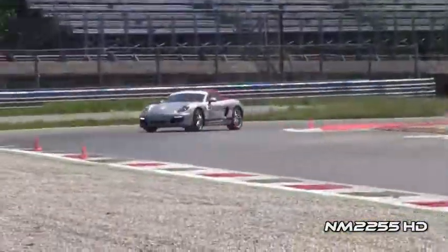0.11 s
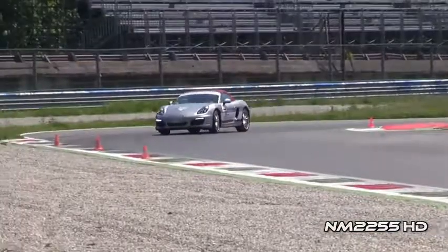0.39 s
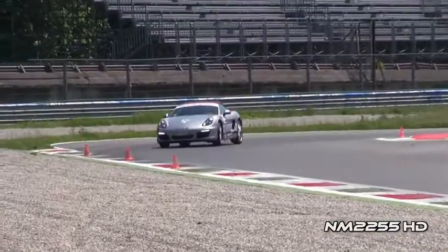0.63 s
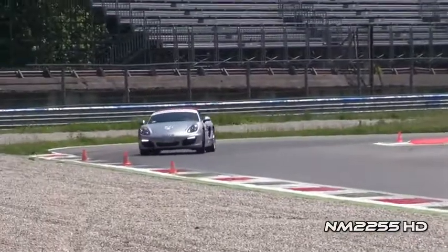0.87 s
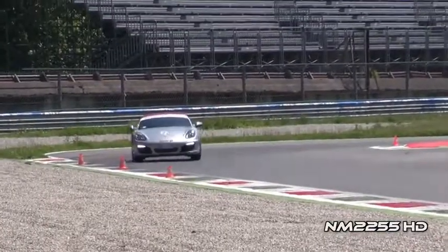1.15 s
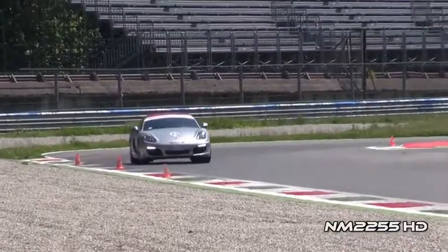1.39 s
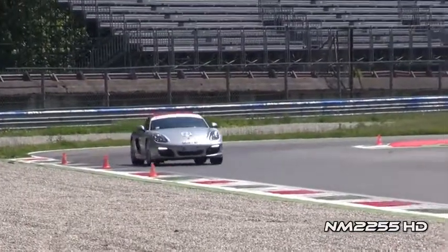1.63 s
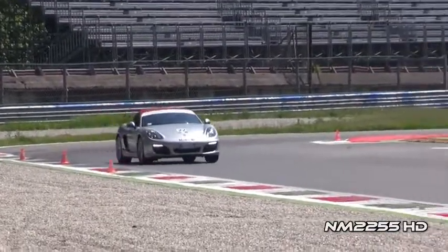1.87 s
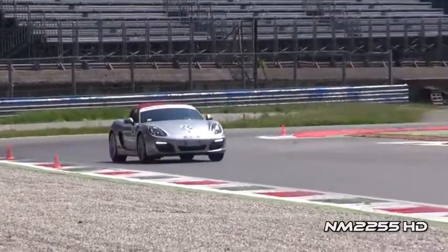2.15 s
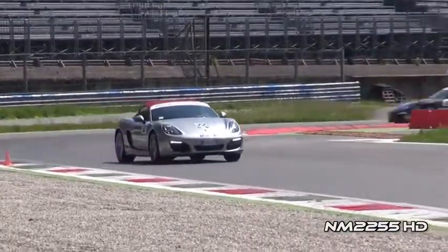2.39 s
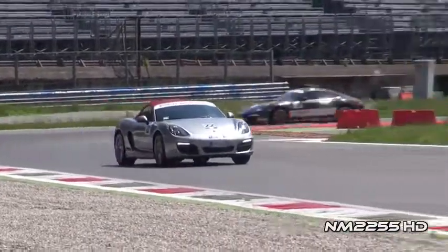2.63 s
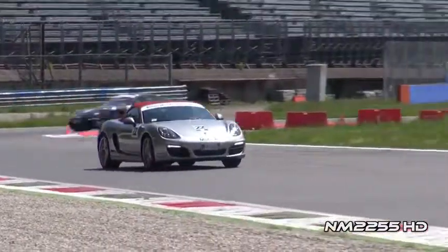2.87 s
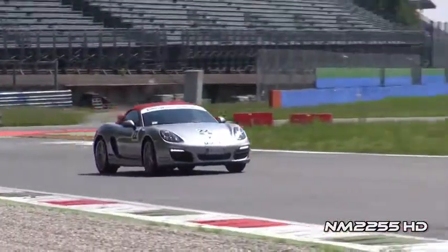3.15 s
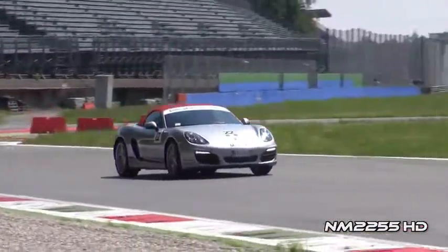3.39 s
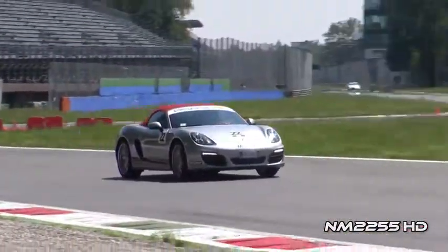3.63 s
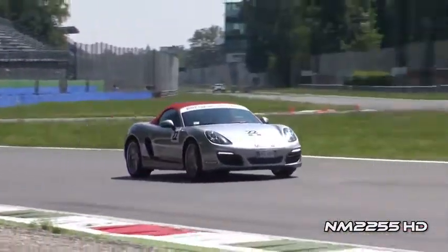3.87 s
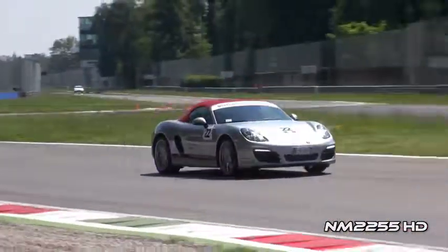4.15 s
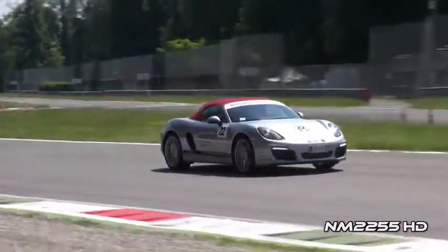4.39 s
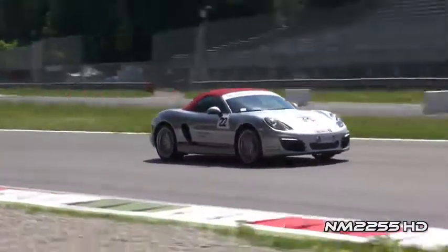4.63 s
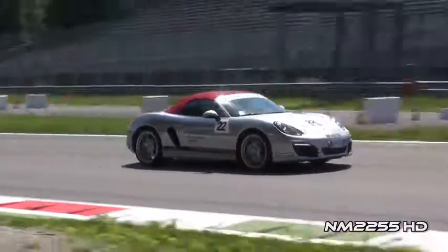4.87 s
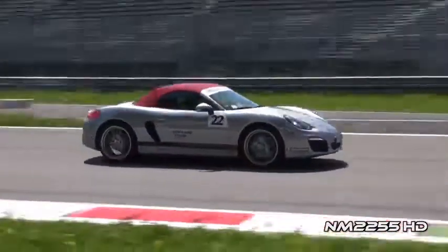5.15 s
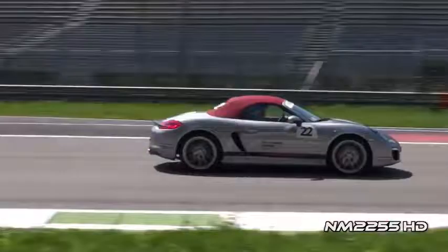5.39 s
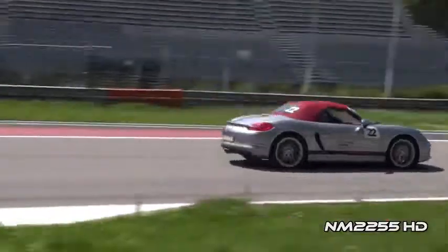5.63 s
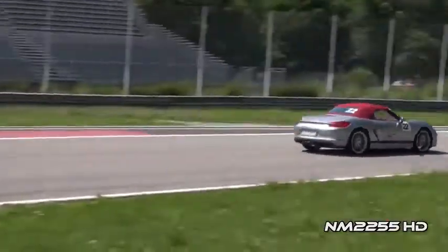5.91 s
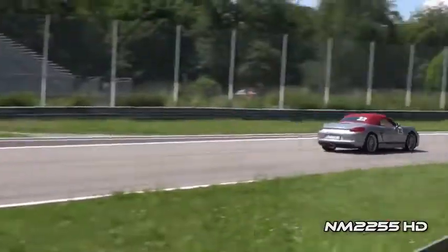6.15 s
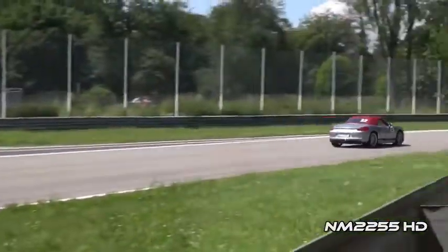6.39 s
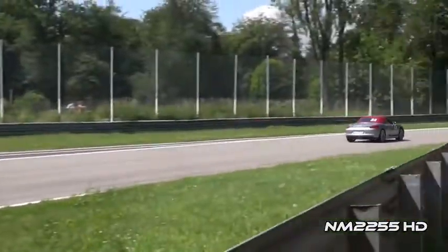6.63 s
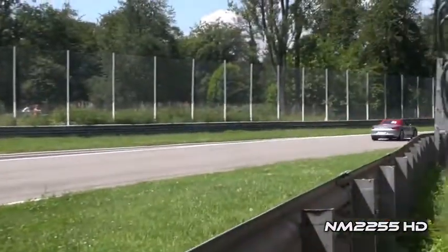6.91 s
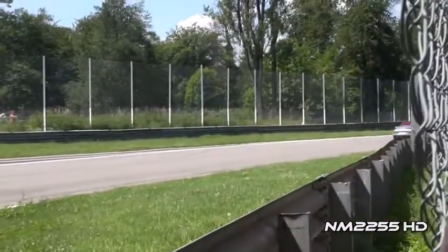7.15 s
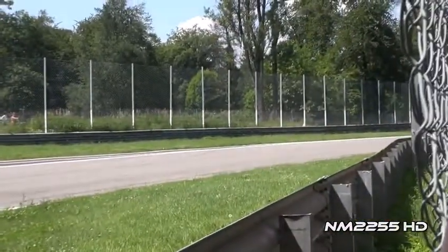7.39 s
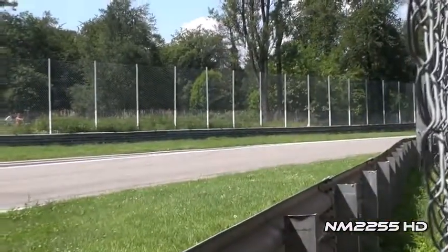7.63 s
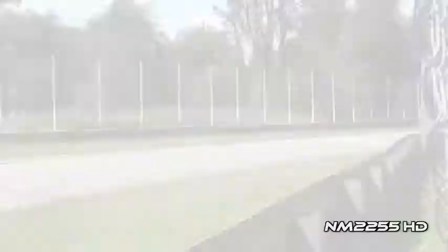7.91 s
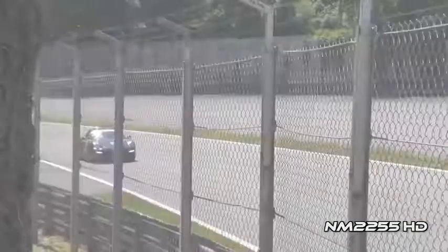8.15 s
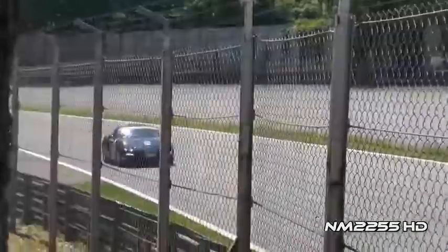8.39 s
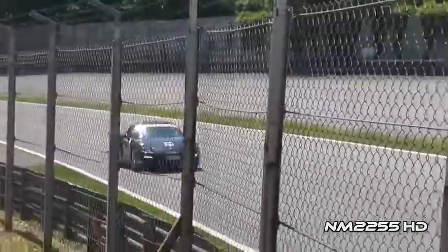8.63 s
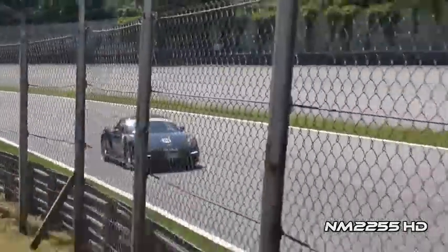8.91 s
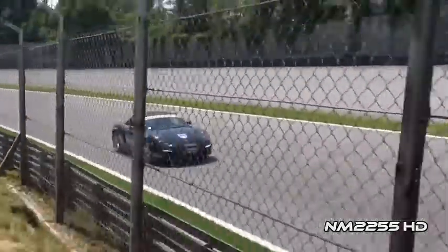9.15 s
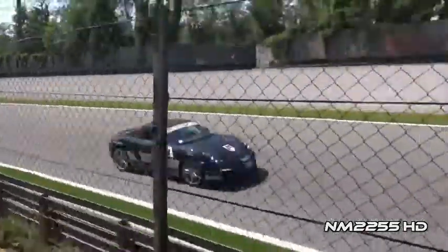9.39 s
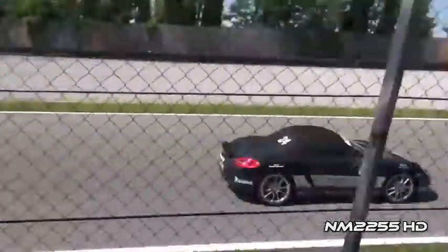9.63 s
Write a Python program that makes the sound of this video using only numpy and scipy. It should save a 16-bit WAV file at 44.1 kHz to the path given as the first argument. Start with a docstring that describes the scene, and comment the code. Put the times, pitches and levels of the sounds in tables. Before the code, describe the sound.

A sports car accelerates out of a bend, shifts up and howls past close by, then another rushes by with a louder tyre roar.

```python
"""Sports cars passing at a race circuit

A six-cylinder car speeds up, shifts up and passes close; a second follows on the left, then a third rushes by.
Engines are sums of pure tones tied to the firing rate, tyres are tones scattered by noise, and the roar is
bands of noise. A bird whistles early on over a far drone, hum and whine; the loudest moments overload."""
import sys
import numpy as np
from scipy import signal
from scipy.fft import irfft, next_fast_len
from scipy.io import wavfile

SR = 44100
rng = np.random.default_rng(int(sys.argv[2]) if len(sys.argv) > 2 else 0)


def voltage_ratio(level):
    """Linear amplitude factor for a level in decibels (scalar or array-like)."""
    return 10 ** (np.asarray(level, float) / 20)


def transcribe(u):
    """Save the signal u as a 16-bit wav file named by the first command-line argument.

    u: samples, shape (n,) or (channels, n), limited to [-1, 1]; the rate is SR.
    q: integer samples, one column per channel.
    """
    v = np.clip(np.atleast_2d(u).T, -1, 1)
    q = np.round(v * 32767).astype(np.int16)
    wavfile.write(sys.argv[1], SR, q)


N = 430857
TIME = np.arange(N) / SR  # seconds
LEFT_RIGHT = np.array([[1], [-1]])  # sign of a left-right difference in each channel

# first car: firing rate and howl of the air intake [t/s, f/Hz, level/dB]
FIRST = [(0.0, 155.5, -75.5), (0.5, 165.6, -77), (1.0, 185.6, -73), (1.75, 211.3, -72), (2.75, 258.2, -72),
         (3.0, 274.1, -56), (3.5, 299.8, -45.5), (3.8, 315.4, -31), (4.05, 327.9, -30.5),
         (4.25, 335.5, -27), (4.55, 352.4, -26), (4.87, 364, -27), (5.03, 358.8, -35), (5.1, 308.4, -36),
         (5.16, 277.2, -31.5), (5.3, 263.3, -29.5), (5.85, 255, -29.5), (6.3, 259.5, -44), (6.7, 265, -52),
         (6.9, 269.5, -38), (7.25, 272.8, -48.5), (7.65, 286, -62), (8.05, 293.4, -60)]
# its tones as multiples of the firing rate, in groups: firing, burble, twice, thrice, upper halves, howl
FIRST_ORDERS = [
    [1],
    [1 / 3, 1 / 2, 2 / 3],
    [2],
    [3],
    [3 / 2, 5 / 2],
    [4 / 3, 5 / 3, 7 / 3, 8 / 3, 10 / 3, 11 / 3, 4, 13 / 3, 14 / 3, 5],
]
# level of each group before the howl [t/s, level/dB]
FIRING = [(0, -50.5), (.5, -61), (1.0, -52.5), (1.75, -37), (2.25, -45), (2.5, -42), (2.8, -52),
          (3.2, -42.5), (3.5, -43), (4.05, -33.5), (4.4, -43.5), (4.6, -32), (4.93, -20.5), (5.03, -23.5),
          (5.1, -17), (5.18, -30), (5.45, -16), (5.65, -27.5), (5.95, -22), (6.45, -32.5), (6.65, -37.5),
          (6.85, -33), (7.05, -47), (7.25, -45), (7.65, -64)]
BURBLE = [(0, -77), (1.2, -69), (1.9, -55), (2.6, -64), (3.25, -52), (3.6, -53), (4.3, -42), (4.5, -47.5),
          (5.05, -33.5), (5.3, -39), (6.1, -46), (6.7, -45), (8.05, -54.5)]
TWICE = [(0, -71), (1.0, -65), (1.75, -50), (2.0, -82), (3.0, -60), (3.5, -51), (3.65, -69), (3.82, -39),
         (3.97, -36.5), (4.15, -59), (4.4, -38), (4.55, -37), (4.7, -27), (4.95, -17.5), (5.1, -36.5),
         (5.45, -21.5), (5.85, -25.5), (6.25, -56), (6.75, -42), (7.1, -49)]
THRICE = [(2.0, -70), (2.25, -54), (2.75, -51), (3.0, -67), (3.35, -44.5), (3.8, -23), (4.1, -31),
          (4.25, -78), (4.55, -23), (4.75, -20.5), (4.93, -22.5), (5.05, -42), (5.11, -13), (5.16, -36),
          (5.45, -21.5), (5.65, -39.5), (6.05, -34), (6.25, -76)]
HALVES = [(4.8, -90), (5.05, -34), (5.2, -32), (5.45, -23), (5.7, -32), (6.2, -36.5), (6.6, -52),
          (6.95, -41), (7.3, -70)]
# resonances of the air intake [f/Hz, width/Hz, peak level/dB]
INTAKE = [(342, 61, -4), (586, 72, -14), (870, 93, 3.5), (1200, 157, 1), (1561, 88, 0.5)]
# second car [t/s, firing f/Hz, firing level/dB, burble level/dB, upper halves level/dB]
SECOND = [(6.05, 251.8, -63, -54, -60), (6.6, 284, -47, -51, -55), (7.0, 300.8, -43, -44, -57),
          (7.27, 311.8, -46, -45, -58), (7.4, 318.8, -36, -45, -49), (7.7, 335.4, -38, -42, -47),
          (7.81, 340, -51, -40, -47), (7.92, 348.7, -37, -42, -45), (8.0, 351, -40.5, -43, -44),
          (8.14, 357, -43.5, -47, -48.5)]
# its groups of multiples, in the order of those levels
SECOND_ORDERS = [
    [1],
    [1 / 2, 2 / 3],
    [3 / 2, 5 / 2],
]
# third car [t/s, firing level/dB, half level/dB, twice level/dB]
THIRD = [(8.5, -48.5, -58, -71), (9.05, -45.5, -45, -57), (9.22, -34.5, -45, -32), (9.3, -24, -53, -25),
         (9.4, -29, -45, -46), (9.5, -17.5, -31.5, -19), (9.57, -25, -23, -26), (9.64, -16, -18.5, -30.5),
         (9.7, -19, -32.5, -45.5), (9.76, -17, -48.5, -28)]
# its groups of multiples, in the order of those levels
THIRD_ORDERS = [
    [1],
    [1 / 2],
    [2],
]

# tyres singing under load, early and while the first car passes [t/s, centre f/Hz, level/dB]
SCRUB = [(0, 900, -48.5), (.5, 870, -46.5), (.8, 881, -45.5), (1.15, 925, -37.5), (1.5, 907, -47),
         (1.8, 897, -65)]
TREAD = [(5.2, 960, -23), (5.35, 974, -16.5), (5.5, 1005, -15.5), (5.65, 1040, -12), (5.87, 1021, -17),
         (5.96, 974, -26.5), (6.3, 975, -28.5)]
# tyres singing as the third car arrives [t/s, centre f/Hz, level/dB]
APPROACH = [(8.35, 1200, -47), (8.75, 1211, -34.5), (9.05, 1180, -25), (9.3, 1043, -19.5),
            (9.55, 929.5, -18), (9.77, 909, -25.5)]
# a brief rasp at the first car's closest moment [t/s, centre f/Hz, level/dB]
RASP = [(5.57, 2050, -39), (5.66, 2180, -16), (5.72, 2260, -33)]

# roar of tyres, exhaust and air [t/s, overall level/dB, low middle relative/dB, treble relative/dB]
ROAR = [(0.0, -50.5, 0.5, 2), (0.09, -43.5, -7.5, -4.5), (0.66, -44, -5.5, -4), (1.17, -41, -12, -5),
        (1.79, -44, -6, -1.5), (2.71, -39, -9, -2.5), (3.3, -38.5, -8.5, 0.5), (3.6, -34, -7.5, 3),
        (3.76, -30, -11, 2.5), (4.08, -27, -10.5, 4.5), (4.17, -21.5, -15, 0), (4.55, -20, -8, 3),
        (4.89, -16, -5, 4.5), (5.08, -14, -2, 2.5), (5.17, -18.5, -1, 4.5), (5.38, -12, -4.5, 0.5),
        (5.75, -12, -7, 2.5), (5.87, -9.5, -10, -1), (5.97, -17, -5, 7), (6.27, -24.5, -0.5, 11),
        (6.42, -24, -7.5, 4.5), (6.87, -29, -5.5, 5), (6.95, -26, -6.5, -0.5), (7.14, -31, -4, 3),
        (7.89, -33.5, -4.5, 7), (8.08, -39, -3, 8.5), (8.25, -39.5, -7, 1), (8.46, -34.5, -7.5, 2.5),
        (8.62, -33.5, -8.5, 5.5), (8.99, -24, -9.5, 0), (9.33, -12.5, -10, -1.5), (9.45, -10.5, -7, 0),
        (9.61, -9, -5.5, 1), (9.77, -12, -3.5, 1)]
# where the low middle and the reference lie [f/Hz]
ROAR_HZ = [510, 1000]
# how other regions follow, relative to the overall level
# [f/Hz, level at a 0 dB roar/dB, then dB per dB of overall level, of treble, of BASS, of HISS]
ROAR_RULE = [(40, -41, -.62, 0, 0.053, 0.16), (75, -41, -.62, 0.1, 1.11, 0),
             (165, -22, -0.29, 0.45, 0.1, 0), (2210, -10.5, 0, 0.96, 0, 0.018),
             (4380, -24.5, 0, 0.99, 0, 0.57), (8000, -25.5, 0, 0.65, 0, 1.6)]
# extra bass and hiss, weighted by that rule [t/s, level/dB]
BASS = [(0, -9), (1.8, 6), (2.9, 3), (4.5, -4.5), (5.7, -6), (6.6, 2), (7.6, 2), (8.2, 7), (8.7, 7),
        (9.3, 12), (9.77, 13)]
HISS = [(0, 4), (2.6, 0), (3.4, -1.5), (4.3, 2), (5.2, 1), (6.2, 1.5), (6.85, 5.5), (7.15, -2), (8.0, -0.5),
        (9.0, -2.5), (9.77, 1)]
# fixed colour added to each third-octave band [f/Hz, level/dB]
ROAR_SHAPE = [(25, -16), (65, -13.5), (165, -7), (300, -7.5), (510, -7.5), (1000, -6), (1500, -3),
              (2100, -2), (3000, -3.5), (4600, -3), (6500, -11.5), (8000, -23), (10000, -40),
              (14000, -52.5)]
# side against middle, before the width in PAN is added [f/Hz, level/dB]
SIDE_SHARE = [(30, -10.5), (80, -26), (300, -19), (1000, -11.5), (4000, -14), (9000, -10.5)]
# swing from side to side and width of the roar [t/s, left minus right level/dB, added side level/dB]
PAN = [(0, -1.5, 5), (1.5, -0.9, 5.5), (3.3, -0.7, 2), (4.3, 0, -3.5), (5.6, -0.3, -3.5), (6.3, -1.5, -4),
       (7.2, -1, 4), (7.7, 1, 10), (8.15, 2.2, 10.5), (8.4, -1, -1.5), (9.2, 0, -5), (9.77, -0.6, -2.5)]

# single bird notes [t/s, length/s, start f/Hz, end f/Hz, level/dB]
BIRD = [(.28, .062, 3435, 3330, -67), (.29, .027, 4500, 4900, -70), (.585, .049, 5600, 5400, -73),
        (.69, 0.036, 3779, 3450, -61), (.765, 0.038, 2610, 3065, -58), (.965, 0.024, 2702, 2935, -55),
        (.992, .04, 3280, 4480, -60)]
# pattern of the bird's phrase: swoop, hold, fall, rise; each phrase sets its own hold length and end pitches
# [t after the start/s, length/s, start f/Hz, end f/Hz, relative level/dB]
PHRASE = [(0, .04, 4450, 3450, -3), (.055, .05, 3520, 3450, -2), (.2, .032, 3150, 2980, -3),
          (.238, .042, 2580, 2900, 0)]
# each phrase [t/s, level/dB, swoop change/dB, hold length/s, end of the fall f/Hz]
PHRASES = [(1.065, -57, -20, .065, 3000), (1.425, -54, -2, .05, 2980), (1.79, -51, -1, .11, 2890),
           (2.16, -54, 0, .04, 2860)]

# a far engine droning, and a brief higher tone [t/s, f/Hz, level/dB]
DRONE = [(.1, 99, -65), (.4, 98.3, -54), (.8, 94.6, -47.5), (1.2, 97, -51), (1.45, 93.3, -72),
         (2.3, 77.8, -60.5), (3.05, 67.73, -55), (3.4, 77, -57), (4.1, 80.3, -54), (4.3, 83, -67)]
BRIEF_TONE = [(0, 552, -67), (.35, 554, -49), (.55, 562, -60), (.7, 560, -72)]
# a low hum [t/s, f/Hz, level/dB]
HUM = [(0, 199.6, -69.5), (9.77, 200, -67)]
# a faint steady whine [f/Hz, level/dB]
WHINE = [(7101, -83), (7149, -84)]


def first_car():
    """Firing rate climbs, drops at the shift up and climbs again; its tones swell and fade separately."""
    hz, howl_db = curves(FIRST)
    tones_db = [curves(table)[0] for table in (FIRING, BURBLE, TWICE, THRICE, HALVES)]
    return engine(FIRST, FIRST_ORDERS, [hz, *tones_db, howl_db], INTAKE)


def second_car(left_minus_right_db=8):
    """An engine with climbing revs, louder on the left."""
    return engine(SECOND, SECOND_ORDERS) * voltage_ratio(left_minus_right_db * LEFT_RIGHT / 2)


def third_car(firing_hz=350, speed_m_s=45, pass_s=9.73, closest_m=6):
    """Steady revs, heard higher on approach and lower after the pass (Doppler shift)."""
    along_m = speed_m_s * (TIME - pass_s)
    toward_listener = along_m / np.hypot(along_m, closest_m)  # -1 coming, +1 leaving
    hz = firing_hz / (1 + speed_m_s / 343 * toward_listener)
    return engine(THIRD, THIRD_ORDERS, [hz, *curves(THIRD)])


def engine(table, orders, controls=None, intake=None, wobble=0.028):
    """Multiples of the firing rate flicker singly on an uneven crank; nearly equal phases build pulses."""
    fourth_db, low_thirds_db, flicker_db = 5.5, -8, 2
    phase_spread = 0.58  # radians
    hz, *levels = controls or curves(table)
    turn = 2 * np.pi * np.cumsum(hz) / SR + wobble * walk(30)  # radians
    total = 0
    for db, group in zip(levels, orders):
        for k in group:
            own_db = fourth_db * (k == 4) + low_thirds_db * (k in (1 / 3, 2 / 3))
            level = voltage_ratio(db + own_db + flicker_db * walk(14))
            tone = level * np.cos(k * turn + rng.normal(0, phase_spread))
            if intake and group is orders[-1]:
                # the howl swells as a tone sweeps through a resonance
                tone = tone * sum(voltage_ratio(peak_db) / (1 + (2 * (k * hz - f) / width) ** 2)
                                  for f, width, peak_db in intake)
            total = total + tone
    return np.sqrt(2) * total * span(table)


def tyres():
    """All the singing of the tyres, and the rasp: each has its own width and patchiness."""
    song = tyre_song(SCRUB, 130, -16, 1.3) + tyre_song(TREAD, 170, -7, 1.9)
    return song + tyre_song(APPROACH, 430, -13.5, 2.3) + tyre_song(RASP, 250, -39, 2)


def tyre_song(table, width_hz, octave_db, patchy_db):
    """Stick-slip of the tread: a tone scattered by noise, in short bursts, with its octave."""
    hz, db = curves(table)
    turn = 2 * np.pi * np.cumsum(hz) / SR
    song = walk(width_hz) * np.sin(turn) + walk(width_hz) * np.cos(turn)
    octave = walk(2.5 * width_hz) * np.sin(2 * turn) + walk(2.5 * width_hz) * np.cos(2 * turn)
    song = song + voltage_ratio(octave_db) * octave
    return song * voltage_ratio(db + patchy_db * walk(28)) * span(table)


def roar():
    """Noise bands with a shared buffet and a flicker partly shared by neighbours; returns middle and side."""
    level_db, low_middle_db, treble_db = curves(ROAR)
    bass_db, hiss_db = curves(BASS)[0], curves(HISS)[0]
    regions = list(zip(ROAR_HZ, [low_middle_db, 0 * level_db]))
    for hz, db, per_level, per_treble, per_bass, per_hiss in ROAR_RULE:
        region_db = db + per_level * level_db + per_treble * treble_db
        regions.append((hz, region_db + per_bass * bass_db + per_hiss * hiss_db))
    regions = sorted(regions, key=lambda r: r[0])
    place = np.log([r[0] for r in regions])
    buffet, flicker, mid, side = walk(11), walk(29), 0, 0
    for hz in 25 * 2 ** (np.arange(28) / 3):  # third-octave steps
        # blend the two regions on either side of this band
        at = np.interp(np.log(hz), place, np.arange(len(place)))
        low = min(int(at), len(place) - 2)
        colour_db = (low + 1 - at) * regions[low][1] + (at - low) * regions[low + 1][1]
        colour_db = colour_db + on_log(hz, ROAR_SHAPE)
        flicker = 0.83 * flicker + 0.58 * walk(30)  # carries over from the band below
        buffet_db = min(hz / 3000, 1) * 0.81 * buffet
        gain = voltage_ratio(level_db + colour_db + buffet_db + 0.6 * flicker)
        mid = mid + gain * band(hz, octaves=0.22)
        side = side + gain * voltage_ratio(on_log(hz, SIDE_SHARE)) * band(hz, octaves=0.26)
    return mid, side


def echo(x, t60, db):
    """Scatter from stands, barriers and trees: fading noise (60 dB in t60 s), different in each channel."""
    t = np.arange(int(0.6 * SR)) / SR
    tail = rng.standard_normal((2, len(t))) * np.exp(-np.log(1000) * t / t60)
    tail = tail * (t > 0.006)  # the first scatter takes a moment to arrive
    tail = tail / np.sqrt((tail ** 2).sum(1, keepdims=True))
    return voltage_ratio(db) * signal.fftconvolve(x[None], tail, axes=1)[:, :N]


def bird(rough_db=2.5, glide_share=0.35):
    """Whistled notes glide to their pitch with a slightly ragged level; the phrase ends lower each time."""
    notes, calls = list(BIRD), np.zeros(N)
    for s, db, swoop_db, hold_s, fall_hz in PHRASES:
        rows = np.array(PHRASE) + [s, 0, 0, 0, db]
        rows[0, 4] += swoop_db
        rows[1, 1] = hold_s
        rows[2:, 2:4] *= fall_hz / PHRASE[2][3]
        notes += list(rows)
    for s, length, start_hz, end_hz, db in notes:
        t = np.arange(int(length * SR)) / SR
        hz = end_hz + (start_hz - end_hz) * np.exp(-t / (glide_share * length))
        swell = np.sin(np.pi * t / length) ** 0.5
        at = int(s * SR)
        calls[at:at + len(t)] += voltage_ratio(db) * swell * np.sin(2 * np.pi * np.cumsum(hz) / SR)
    return np.sqrt(2) * calls * voltage_ratio(rough_db * walk(82))


def far_engine():
    """A far engine's low drone and a brief higher tone, both with an unsteady turn."""
    return engine(DRONE, orders=[[1]], wobble=0.25) + engine(BRIEF_TONE, orders=[[1]], wobble=0.3)


def hum_and_whine():
    """A slightly wavering low hum, opposite in the two channels, and steady high sine tones."""
    whine = sum(np.sqrt(2) * voltage_ratio(db) * np.sin(2 * np.pi * hz * TIME) for hz, db in WHINE)
    return whine + engine(HUM, orders=[[1]], wobble=0.3) * LEFT_RIGHT


def curves(table):
    """Draws each column after the first as a line over the whole time axis."""
    s, *columns = np.transpose(table)
    return [np.interp(TIME, s, c) for c in columns]


def span(table, fade_s=0.11):
    """1 while a table lasts, fading just outside its ends."""
    inside_s = np.minimum(TIME - table[0][0], table[-1][0] - TIME)
    return np.clip(inside_s / fade_s + 1, 0, 1)


def on_log(hz, points):
    """Reads a value between (f/Hz, value) points on a log pitch axis."""
    return np.interp(np.log(hz), np.log([p[0] for p in points]), [p[1] for p in points])


def walk(rate):
    """Random wander in straight lines between 'rate' points a second, spread near 1."""
    knots = rng.standard_normal(int(N / SR * rate) + 3)
    return 1.08 * np.interp(TIME * rate, np.arange(len(knots)), knots)


def band(hz, octaves):
    """Noise in a bell-shaped band of pitches, rms 1, built from random waves."""
    size = next_fast_len(N)
    f = np.arange(size // 2 + 1) * SR / size
    low_hz, high_hz = hz * 2 ** (-3 * octaves), min(hz * 2 ** (3 * octaves), SR / 2)
    keep = slice(int(low_hz * size / SR), int(high_hz * size / SR))
    bell = np.exp(-(np.log2(f[keep] / hz) / octaves) ** 2)
    spectrum = np.zeros(len(f), complex)
    spectrum[keep] = bell * (rng.standard_normal(len(bell)) + 1j * rng.standard_normal(len(bell)))
    x = irfft(spectrum, size)[:N]
    return x / x.std()


def scene():
    """Most sources swing together from side to side; echoes, hum and whine stay put."""
    pan_db, width_db = curves(PAN)
    cars = first_car() + third_car()
    tyre_sound = tyres()
    mid, side = roar()
    calls = bird()
    direct = cars + second_car() + tyre_sound + far_engine() + calls
    direct = direct + mid + voltage_ratio(width_db) * side * LEFT_RIGHT
    echoes = echo(cars + tyre_sound, t60=0.13, db=-18.5) + echo(calls, t60=0.5, db=-2.5)
    return direct * voltage_ratio(pan_db * LEFT_RIGHT / 2) + echoes + hum_and_whine()


def band_limit(x):
    """A steep low-pass at the top of the band."""
    return signal.sosfilt(signal.butter(12, 15700, fs=SR, output="sos"), x)


def record(dry, knee=4.5):
    """The preamplifier rounds the loudest peaks, then the converter clips flat at full scale."""
    rounded = knee * np.tanh(dry / knee)
    clipped = np.clip(rounded, -1, 1)
    return band_limit(clipped)


dry = scene()
out = record(dry)
transcribe(out)
```